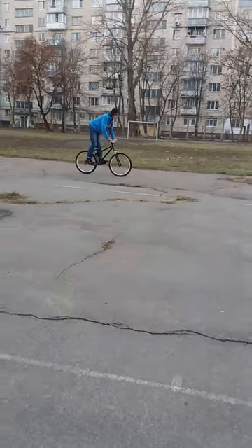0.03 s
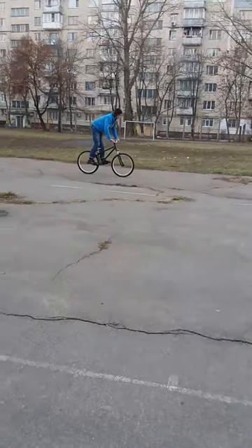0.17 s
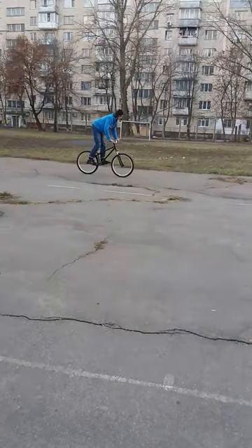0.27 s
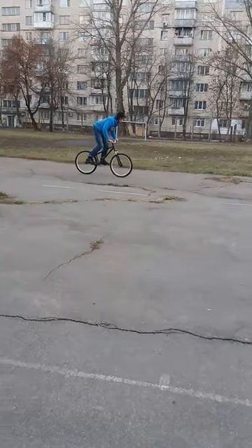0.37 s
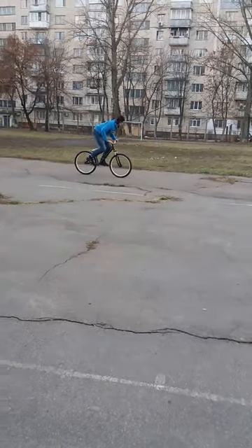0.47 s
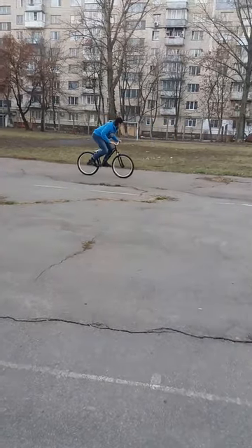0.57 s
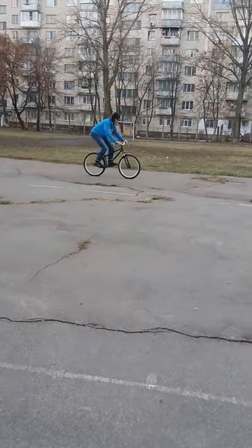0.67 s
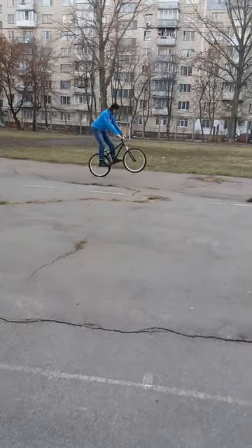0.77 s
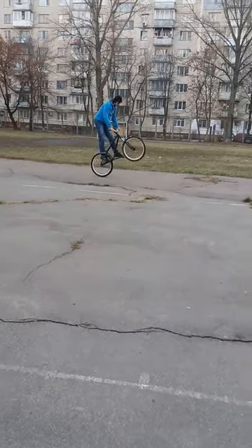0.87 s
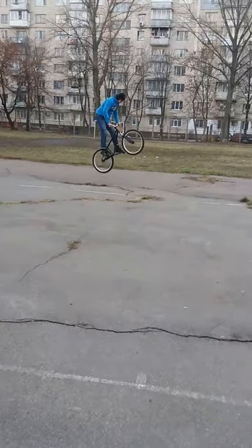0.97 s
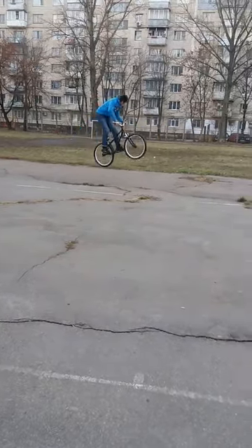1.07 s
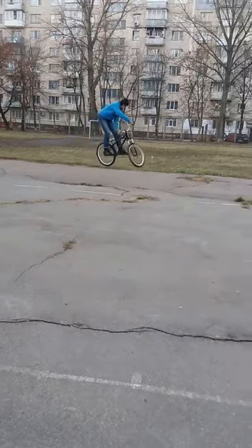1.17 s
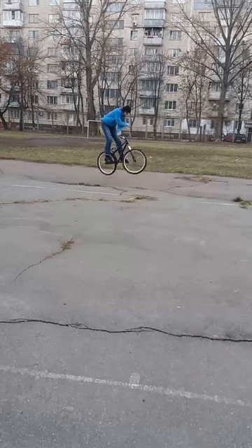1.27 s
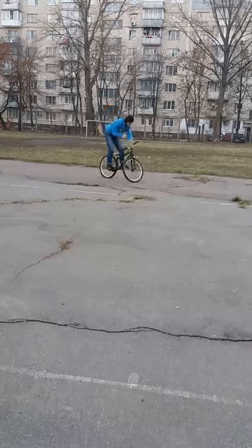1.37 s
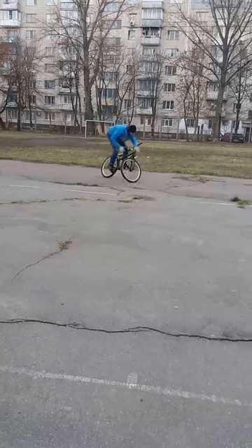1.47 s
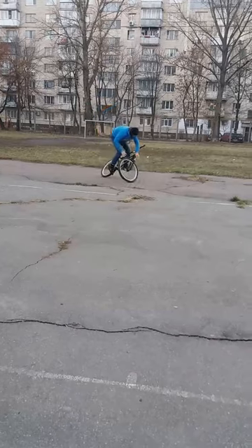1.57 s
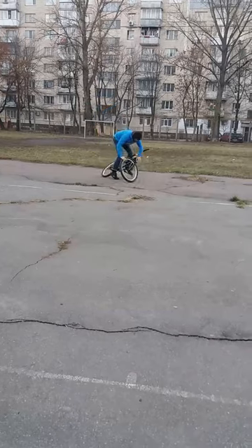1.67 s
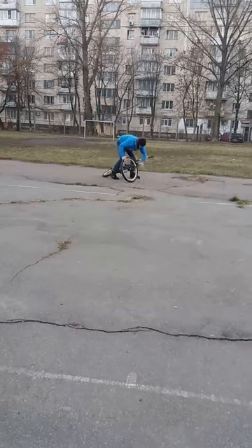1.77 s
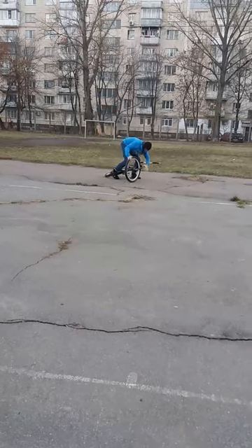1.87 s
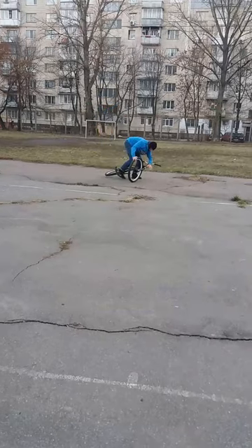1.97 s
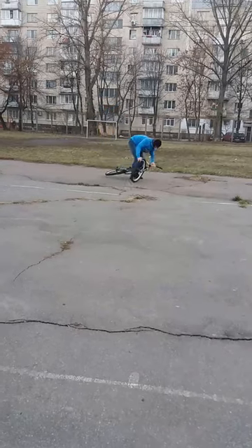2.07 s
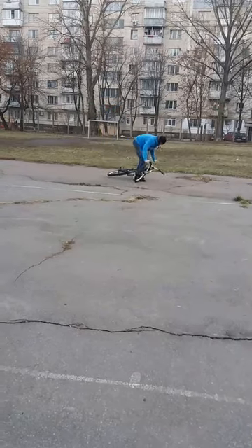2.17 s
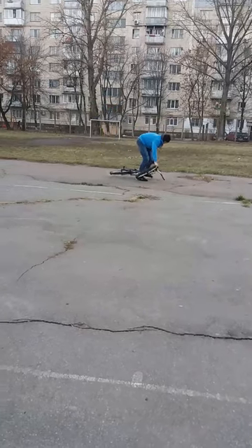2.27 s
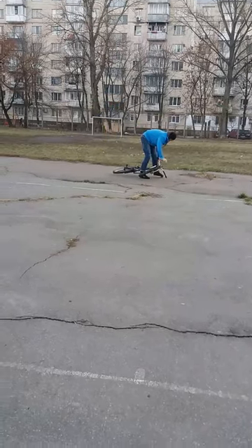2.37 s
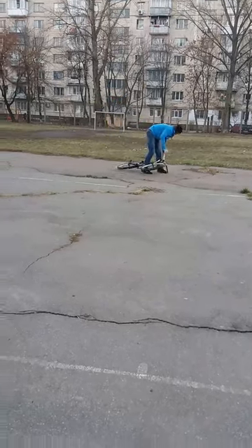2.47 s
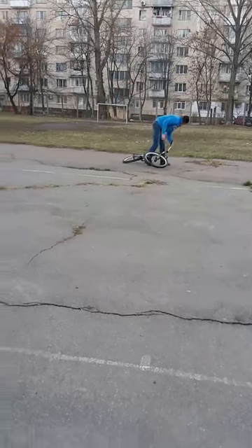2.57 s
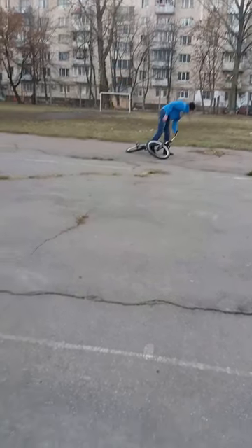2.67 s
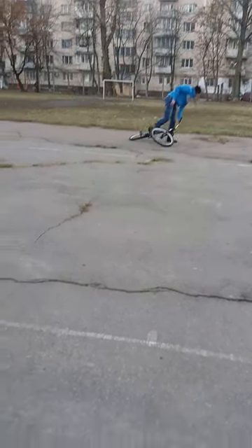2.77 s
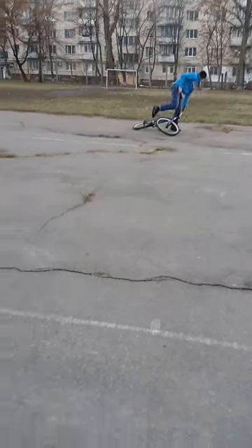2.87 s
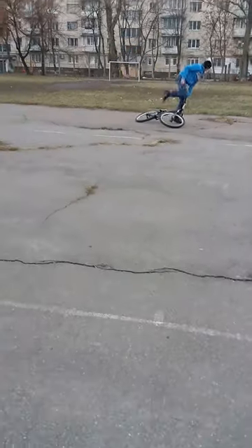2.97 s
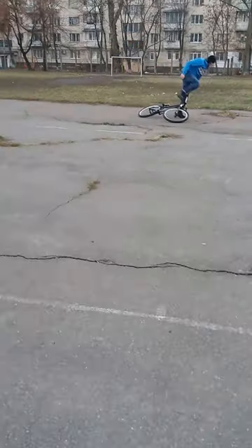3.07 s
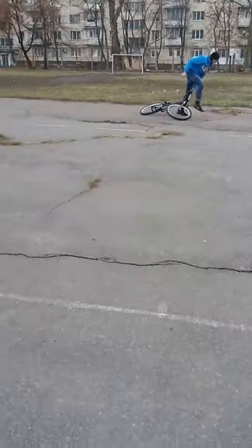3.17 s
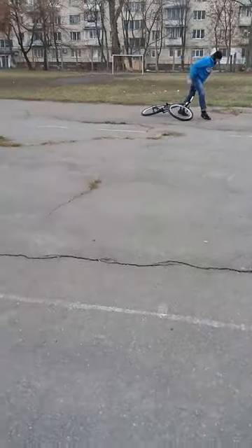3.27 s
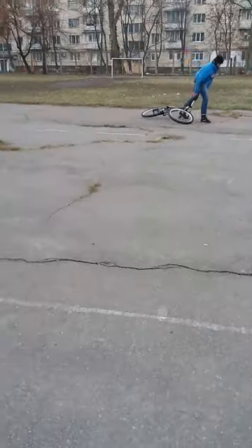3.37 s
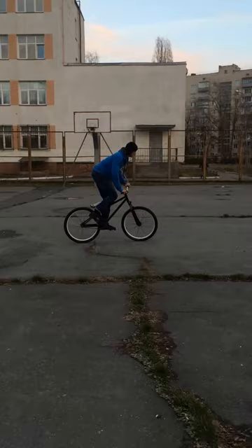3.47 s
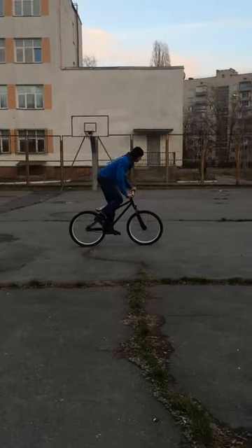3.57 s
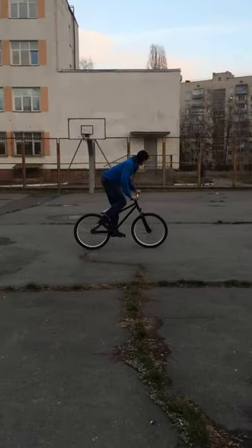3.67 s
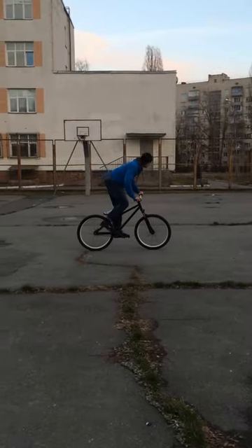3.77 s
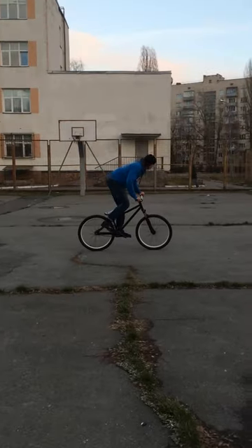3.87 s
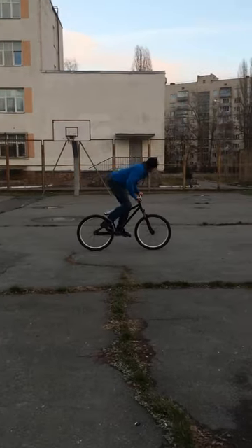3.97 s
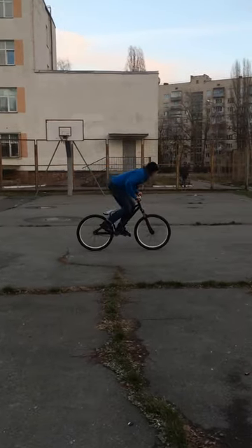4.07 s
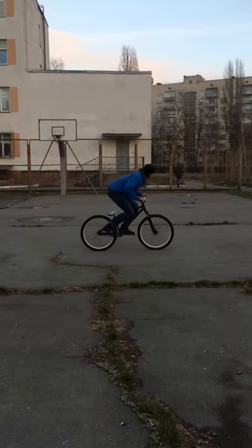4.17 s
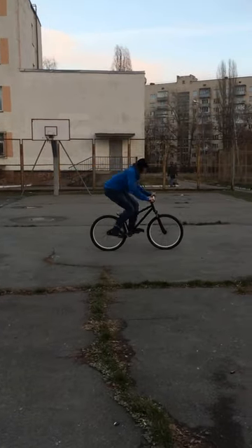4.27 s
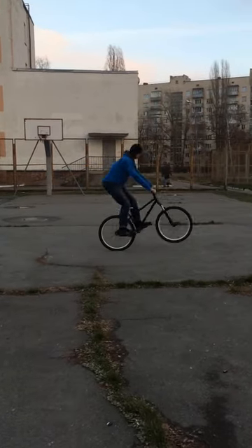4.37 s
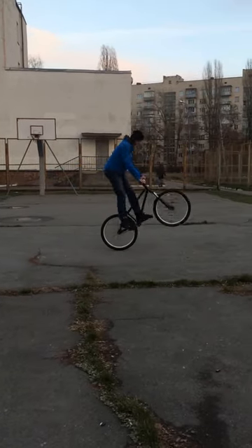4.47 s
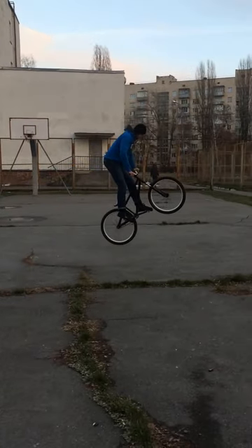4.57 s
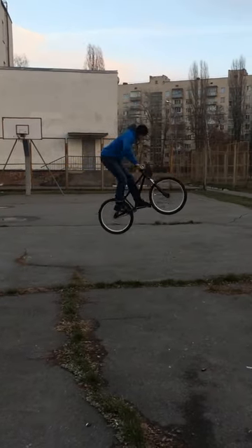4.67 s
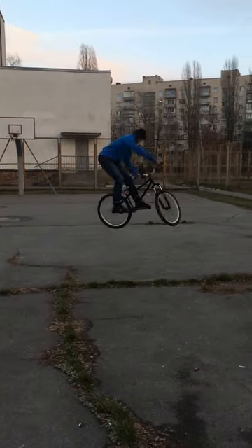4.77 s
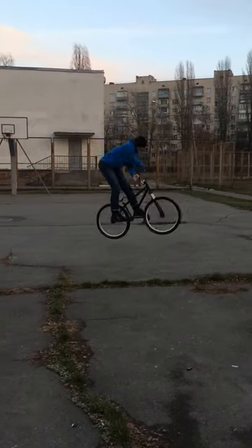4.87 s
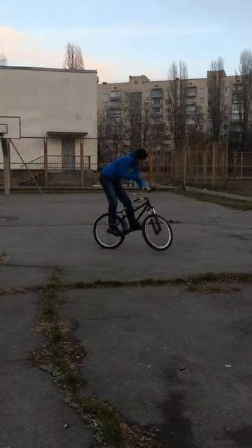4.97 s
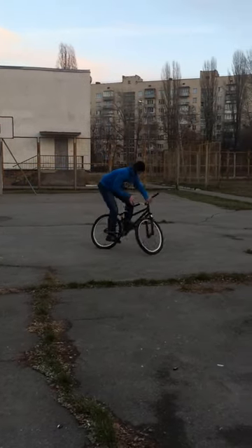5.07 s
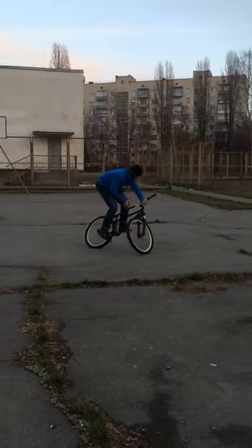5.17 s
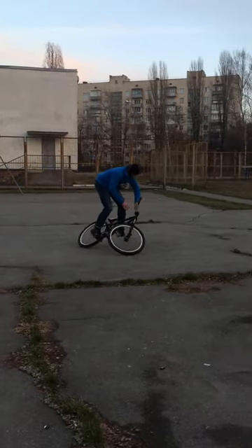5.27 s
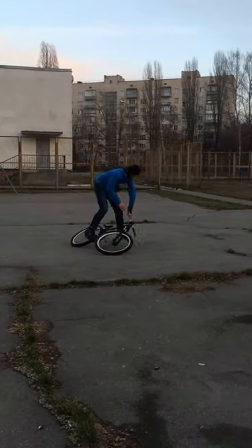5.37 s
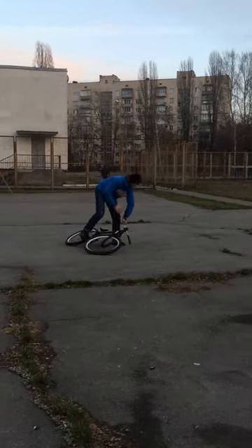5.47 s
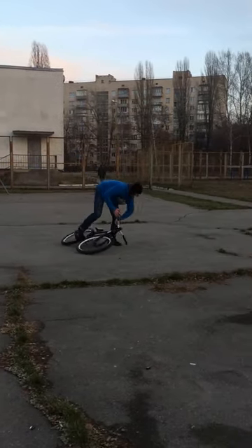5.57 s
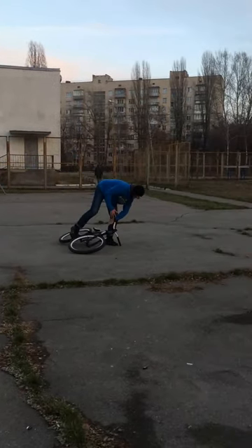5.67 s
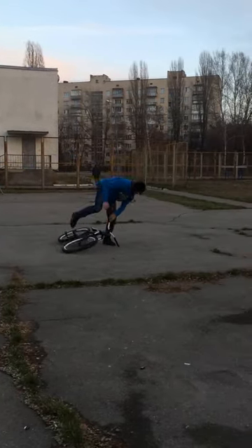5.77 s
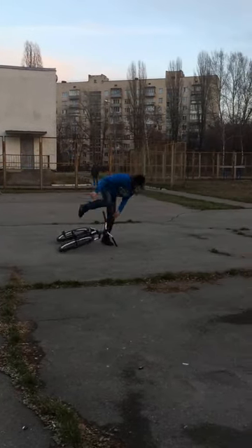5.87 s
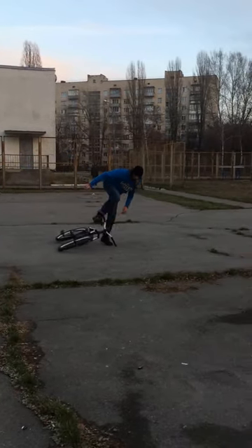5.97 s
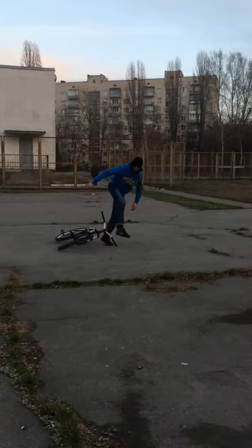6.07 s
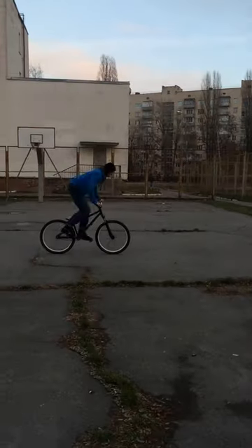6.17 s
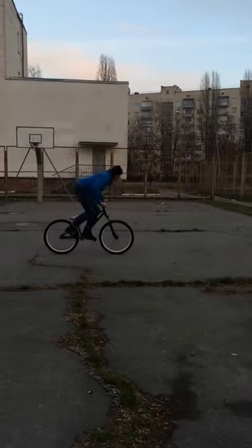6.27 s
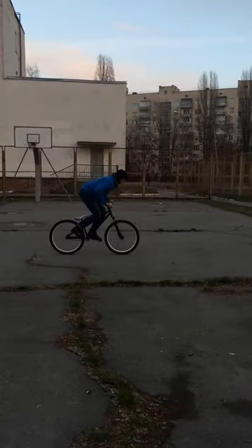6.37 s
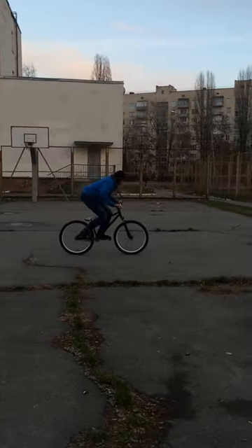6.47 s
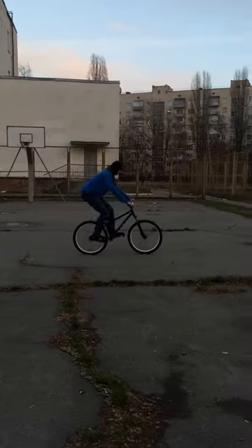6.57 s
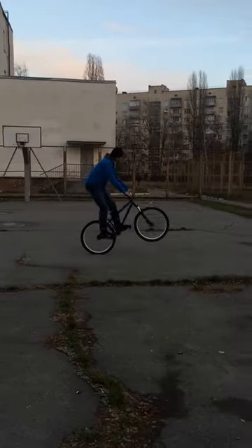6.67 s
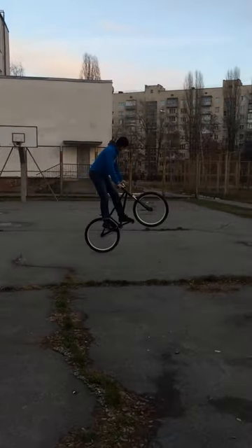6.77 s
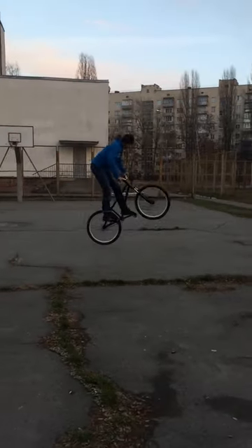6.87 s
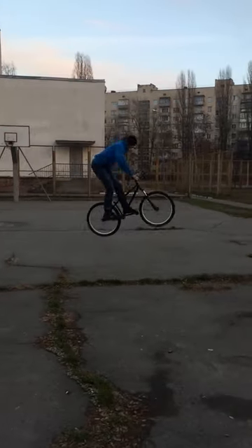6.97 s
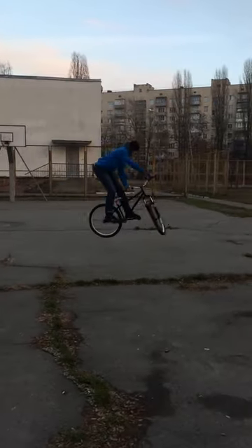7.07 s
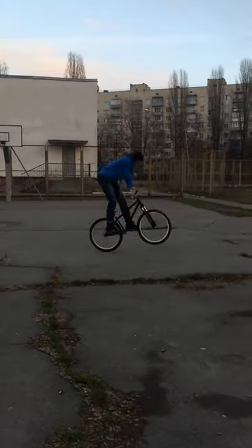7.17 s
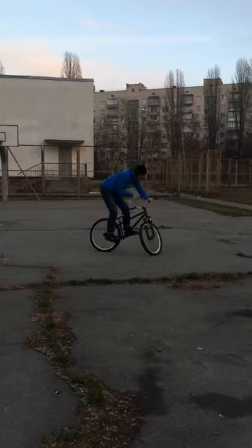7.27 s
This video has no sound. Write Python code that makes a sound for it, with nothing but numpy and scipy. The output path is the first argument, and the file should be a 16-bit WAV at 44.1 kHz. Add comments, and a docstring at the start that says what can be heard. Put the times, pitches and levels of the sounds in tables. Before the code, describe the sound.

Low town rumble and soft distant traffic run throughout. A hollow far tone dies away within 0.4 s while a distant bike rolls faintly on asphalt. A small stone snap and tyre scrub mark the hop at 0.8 s; clanks from 1.3 s lead to a sharp crack, thud and chattering clatter at 1.4 s. The bike tips over with scrapes, a knock at 1.9 s, a tiny rubber groan and clanks until 2.6 s. Close rustling follows from 2.65 s, with thumps and a rising groan near 3.45 s. At 3.5 s the sound turns close and bright: a loud stone snap at 3.6 s, freewheel ticks quickening before the 4.4 s hop. A heavy landing at 5.1 s sprays grit; metal clatters at 5.5 s as the bike falls. Ticks resume at 6.2 s, a hop at 6.7 s, and a hard cracking landing at 7.3 s, with short yard echoes.

```python
"""A far tone dies away over town rumble as a mountain bike, far off, rolls on asphalt and hops at 0.8 s.
It lands at 1.4 s: damped sines crack and thud, noise bursts clatter, frame modes ring; a close rustle follows.
At 3.5 s the listener's place jumps close to the bike: brighter, with freewheel ticks of ringing noise.
Hops at 4.4 s and 6.7 s land at 5.1 s and 7.3 s; grainy noise makes tyres, scrapes, rustle and town.
Twice the bike falls on its side; stones snap, gliding sines groan, the yard answers with a noise tail."""
import sys
import numpy as np
from scipy import signal
from scipy.fft import rfft, irfft, next_fast_len
from scipy.io import wavfile
from scipy.ndimage import uniform_filter1d, map_coordinates

SR = 44100
rng = np.random.default_rng(int(sys.argv[2]) if len(sys.argv) > 2 else 0)


def digitize_waveform(pressure):
    """Quantize a signal to 16-bit integers and store it at the path in sys.argv[1].

    Rows of a 2-D input are taken as channels; values are limited to [-1, 1].
    """
    field = np.atleast_2d(pressure).T
    bounded = np.clip(field, -1, 1)
    quanta = np.round(bounded * 32767).astype(np.int16)
    wavfile.write(sys.argv[1], SR, quanta)


N = 323246


def amp(db):
    """Amplitude of a level in dB."""
    return 10 ** (np.asarray(db) / 20)


def unit(x):
    """Scale to rms 1."""
    return x / np.sqrt(np.mean(x ** 2) + 1e-20)


def clock(length=N):
    """Sample times in seconds."""
    return np.arange(length) / SR


def sine(hz, t):
    """Steady tone."""
    return np.sin(2 * np.pi * hz * t)


def glide(hz):
    """Tone whose frequency follows a curve."""
    return np.sin(2 * np.pi * np.cumsum(hz) / SR)


def decay(t, t60):
    """Exponential fall, 60 dB in t60 seconds."""
    return np.exp(-np.log(1000) * t / max(t60, 1e-4))


def swell(s, sigma_s):
    """Gaussian rise and fall around time s."""
    return np.exp(-((clock() - s) / sigma_s) ** 2 / 2)


def wobble(rate_hz):
    """Smooth random curve, rate_hz knots a second."""
    knots = rng.standard_normal(int(N * rate_hz / SR) + 4)
    return map_coordinates(knots, [np.arange(N) * rate_hz / SR])


def along(points, hz):
    """Interpolate (hz, value) points on a log-frequency axis."""
    f, v = np.transpose(points)
    return np.interp(np.log(hz + 1), np.log(f), v)


def curves(rows):
    """One value per sample for each column after the time."""
    s, *columns = np.transpose(rows)
    return [np.interp(clock(), s, column) for column in columns]


def during(rows):
    """Soft-edged gate over the time a table spans."""
    t = clock()
    inside = (t >= rows[0][0]) & (t <= rows[-1][0])
    return uniform_filter1d(1.0 * inside, size=256)


def coloured(x, spectrum):
    """Minimum-phase filter through (hz, gain_db) points."""
    m = 2 * next_fast_len(len(x) // 2 + 2048)
    gain = amp(along(spectrum, np.fft.rfftfreq(m, 1 / SR)))
    cepstrum = irfft(np.log(gain))
    # folding onto positive time makes the filter causal
    cepstrum[1:m // 2] *= 2
    cepstrum[m // 2 + 1:] = 0
    return irfft(rfft(x, m) * np.exp(rfft(cepstrum)))[:len(x)]


def rush(spectrum, grain_db):
    """Coloured noise of rms 1 whose strength flickers on a scale of about 1.5 ms."""
    grain = amp(grain_db * np.tanh(wobble(SR / 64)))
    return unit(coloured(rng.standard_normal(N) * grain, spectrum))


def add(track, s, sound):
    """Mix a sound in at time s."""
    start = min(max(round(s * SR), 0), N)
    track[start:start + len(sound)] += sound[:N - start]


# the listener's place jumps from far to near
CUT_S = 3.511
# background, one table for the far place and one for the near: start_s, rumble_db, traffic_db
TOWN_LEVELS = [
    [(0.0, -45.5, -50.5), (0.33, -49, -51), (1.18, -47.5, -50), (1.62, -42.5, -47), (2.02, -48, -50.5),
     (2.84, -46, -42), (3.34, -49, -51), (3.5, -41, -53)],
    [(3.52, -44, -57), (3.74, -45.5, -57), (4.98, -44, -55.5), (5.12, -41.5, -54), (5.8, -47, -50),
     (6.25, -46, -58), (7.05, -47.5, -56.5), (7.2, -44, -57)],
]
# swelling deep hum: start_s, level_db
HUM_LEVELS = [(3.5, -51), (4.14, -45.5), (4.32, -36), (5.45, -42), (5.75, -55.5), (7.33, -48.5)]
# rumble and traffic spectra at each place: freq_hz, gain_db
FAR_RUMBLE_SPECTRUM = [(25, -76), (45, -28), (65, 2.5), (85, 5.5), (140, 3.5), (210, -1), (300, -16.5),
                       (500, -46.5)]
NEAR_RUMBLE_SPECTRUM = [(25, -28), (45, -11), (65, 4), (115, 5.5), (160, 2), (230, -1), (310, -21),
                        (500, -49)]
FAR_TRAFFIC_SPECTRUM = [(150, 0), (300, 4.5), (430, 0.5), (620, -3.5), (900, -3.5), (1450, 0),
                        (1900, -12.5), (3000, -16.5), (4200, -28), (6500, -38.5), (9000, -46.5),
                        (12000, -36.5), (15500, -31)]
NEAR_TRAFFIC_SPECTRUM = [(150, -2), (300, 3), (420, -3), (650, -1.5), (1000, -2), (1600, -8), (2500, -18),
                         (4000, -25), (8000, -43), (15000, -81)]


def town(far_trim_db=1, near_trim_db=2, hum_hz=54.2, waver_hz=1.07, hum_trim_db=-1):
    """Grainy noise for rumble and traffic, coloured by place, plus a wavering deep sine."""
    rumble_db, traffic_db = curves(np.concatenate(TOWN_LEVELS))
    far = clock() < CUT_S
    rumble = np.where(far, rush(FAR_RUMBLE_SPECTRUM, grain_db=2.5), rush(NEAR_RUMBLE_SPECTRUM, grain_db=2.5))
    far_traffic = amp(far_trim_db) * rush(FAR_TRAFFIC_SPECTRUM, grain_db=1.66)
    near_traffic = amp(near_trim_db) * rush(NEAR_TRAFFIC_SPECTRUM, grain_db=0.1)
    traffic = np.where(far, far_traffic, near_traffic)
    hum = unit(glide(hum_hz + waver_hz * wobble(4.2))) * during(HUM_LEVELS)
    out = amp(rumble_db) * rumble
    out += amp(traffic_db + 0.73 * wobble(7)) * traffic
    return out + amp(curves(HUM_LEVELS)[0] + hum_trim_db) * hum


# hollow distant tone dying away: start_s, level_db
HOOT_LEVELS = [(0, -38), (.065, -41.5), (.14, -42.5), (.18, -50.5), (.3, -50.5), (.4, -82)]
# its resonances: pitch_hz, half_width_hz, gain_db
HOOT_BANDS = [(439, 23, 2.5), (780, 110, -10), (936, 59, -12.5), (1380, 140, -14)]


def hoot():
    """A far tone, smeared by the buildings: noise in narrow resonant bands."""
    f = np.fft.rfftfreq(N, 1 / SR)
    gain = sum(amp(db) / (1 + ((f - hz) / width_hz) ** 2) for hz, width_hz, db in HOOT_BANDS)
    tone = unit(irfft(rfft(rng.standard_normal(N)) * gain, N))
    return amp(curves(HOOT_LEVELS)[0]) * tone


# close rubbing: start_s, body_db, hiss_db
RUSTLE_LEVELS = [(2.648, -39, -70), (2.658, -34, -56), (2.84, -31, -51), (2.9, -45.5, -53),
                 (3.03, -45, -55), (3.095, -36.5, -56), (3.14, -50, -56.5), (3.33, -55, -75),
                 (3.38, -44, -74), (3.45, -43, -70), (3.508, -34, -48)]
# body and hiss spectra: freq_hz, gain_db
BODY_SPECTRUM = [(35, -19), (70, -0.5), (140, 5.5), (300, 0.5), (700, -3), (1200, -0.5), (1550, 0),
                 (2000, -11), (3000, -15), (5000, -35)]
HISS_SPECTRUM = [(1500, 1.5), (3000, 7.5), (3900, -1), (4700, 5.5), (5700, -3.5), (6600, 0.5), (7500, 4),
                 (8800, -6.5), (11000, -5.5), (16000, -25)]


def rustle(body_trim_db=-1):
    """Soft close rubbing: low and high bands of grainy noise on separate level curves."""
    body_db, hiss_db = curves(RUSTLE_LEVELS)
    body = amp(body_db + body_trim_db) * rush(BODY_SPECTRUM, grain_db=4)
    hiss = amp(hiss_db) * rush(HISS_SPECTRUM, grain_db=2.5)
    return during(RUSTLE_LEVELS) * (body + hiss)


# short rubbery groans, one table each: start_s, pitch_hz, level_db
GROAN_GLIDES = [
    [(1.895, 300, -60), (1.92, 327, -40), (1.945, 330, -42), (1.975, 310, -60)],
    [(3.455, 152.8, -49), (3.472, 257, -32.5), (3.49, 322, -29.5), (3.503, 337, -30.5), (3.512, 340, -69)],
]


def groans():
    """Rubber sticks and slips at a gliding rate, voiced as sines."""
    out = np.zeros(N)
    for rows in GROAN_GLIDES:
        hz, db = curves(rows)
        out += during(rows) * amp(db) * glide(hz)
    return out


# tread rolling over grit: start_s, level_db
ROLL_LEVELS = [(0, -68), (3.4, -66), (4.1, -72.5), (5.4, -61), (5.9, -71.5), (6.02, -80), (6.2, -67),
               (7.33, -66)]
# bunny hops: liftoff_s, push_db, scrub_db
HOP_EVENTS = [(0.799, -60, -42), (4.42, -63, -37), (6.681, -61.5, -41)]


def tread(push_lead_s=0.053, push_sigma_s=0.1, scrub_sigma_s=0.0062,
          apex_s=0.27, flight_sigma_s=0.079, flight_db=-9,
          spray_t60_s=0.2, settle_db=-19, settle_t60_s=0.67):
    """Tyre pressure on grit: rolls, pushes off with a scrub, eases in flight, sprays on landing."""
    t = clock()
    airborne = sum(swell(liftoff_s + apex_s, flight_sigma_s) for liftoff_s, _, _ in HOP_EVENTS)
    out = amp(curves(ROLL_LEVELS)[0] + flight_db * airborne)
    for liftoff_s, push_db, scrub_db in HOP_EVENTS:
        out += amp(push_db) * swell(liftoff_s - push_lead_s, push_sigma_s)
        out += amp(scrub_db) * swell(liftoff_s, scrub_sigma_s)
    spray = decay(t, spray_t60_s) + amp(settle_db) * decay(t, settle_t60_s)
    for start_s, *_, grit_db in LANDING_EVENTS:
        add(out, start_s, amp(grit_db) * spray)
    return out


# short gritty scrapes, and one faint fine hiss at 3.53 s:
# centre_s, level_db, sigma_s, coarse_relative_db
SCRAPE_EVENTS = [(1.498, -50.5, 0.03, 10), (1.642, -54, .004, 11), (1.66, -45, .015, 4.5),
                 (1.749, -53, 0.019, 9.5), (1.916, -62.5, .008, 21.5), (2.157, -50.5, 0.0074, 7),
                 (2.203, -50, .008, 9.5), (2.36, -53, 0.0037, 13), (2.52, -59, 0.14, 0),
                 (3.218, -41, 0.0051, -6), (3.448, -37.5, 0.0097, 0.5), (3.527, -63, 0.016, -20),
                 (4.94, -45.5, 0.011, -3), (5.238, -44.5, 0.018, -22), (5.6, -64, 0.047, 9),
                 (5.84, -59.5, 0.052, -4)]
# fine and coarse grain spectra: freq_hz, gain_db
FINE_SPECTRUM = [(500, -2.5), (1500, 2.5), (3000, 3.5), (4500, 3.5), (7000, -0.5), (10000, -3.5),
                 (15000, -7)]
COARSE_SPECTRUM = [(100, -8), (300, 1), (900, -5), (1600, 2.5), (2300, -5.5), (3500, -13), (7000, -61)]


def scrapes(tread_trim_db=-1):
    """Fine grainy noise for rolling and short strokes; each stroke adds its share of coarse noise."""
    fine = amp(tread_trim_db) * tread()
    coarse = np.zeros(N)
    for centre_s, db, sigma_s, coarse_db in SCRAPE_EVENTS:
        stroke = amp(db) * swell(centre_s, sigma_s)
        fine += stroke
        coarse += amp(coarse_db) * stroke
    return fine * rush(FINE_SPECTRUM, grain_db=6) + coarse * rush(COARSE_SPECTRUM, grain_db=7)


# freewheel runs, slow coasting and fast with the front wheel pulled up:
# start_s, end_s, rate_per_s, level_db
TICK_RUNS = [(3.663, 3.95, 21.6, -36.5), (3.996, 4.23, 21, -37.5), (4.246, 4.4, 55, -35),
             (4.474, 4.56, 15, -35.5), (4.726, 4.86, 17, -37), (6.183, 6.36, 19.4, -38.5),
             (6.409, 6.49, 16.9, -37), (6.507, 6.74, 55, -38), (6.968, 7.14, 20, -39)]


def pawl_ticks(scatter_s=0.0011, scatter_db=0.9):
    """(start_s, level_db) of each tooth passing the pawl, nearly even within a run."""
    ticks = []
    for start_s, end_s, rate_per_s, db in TICK_RUNS:
        scatter = rng.standard_normal(size=(32, 2))
        for s, (late, louder) in zip(np.arange(start_s, end_s, 1 / rate_per_s), scatter):
            ticks.append((s + scatter_s * late, db + scatter_db * louder))
    return ticks


# freewheel colour: freq_hz, gain_db
TICK_SPECTRUM = [(1500, -15), (3300, -2.5), (4800, -8.5), (6500, -7), (9200, -7), (11000, -7.5),
                 (13000, -5.5), (16000, -10)]


def freewheel(trim_db=-4, noise_t60_s=0.035, rise_t60_s=0.0081,
              ring_hz=9200, ring_db=-15, ring_t60_s=0.062):
    """Tiny bright ticks: noise and a hub-shell ring swell, then decay."""
    out, t = np.zeros(N), clock(SR // 10)
    for start_s, db in pawl_ticks():
        ring = amp(ring_db) * sine(ring_hz * rng.normal(1, 0.0013), t) * decay(t, ring_t60_s)
        noise = rng.standard_normal(len(t)) * decay(t, noise_t60_s)
        add(out, start_s, amp(db + trim_db) * (noise + ring) * (1 - decay(t, rise_t60_s)))
    return coloured(out, TICK_SPECTRUM)


# stones snapping under the tread: start_s, level_db
STONE_EVENTS = [(0.409, -34.5), (0.798, -27), (3.6066, -14), (3.8001, -30.5), (4.0384, -37.5),
                (4.2507, -28)]


def stones(trim_db=1, snap_hz=4100, snap_t60_s=0.0022, dust_db=-15, dust_t60_s=0.01):
    """A pinched stone snaps as a short damped sine and scatters dust as noise."""
    out, t = np.zeros(N), clock(SR // 20)
    for start_s, db in STONE_EVENTS:
        snap = sine(snap_hz, t) * decay(t, snap_t60_s)
        dust = coloured(rng.standard_normal(len(t)) * decay(t, dust_t60_s), CLINK_SPECTRUM)
        add(out, start_s, amp(db + trim_db) * (snap + amp(dust_db) * dust))
    return out


# chain, pedals and bars striking once: start_s, level_db, knock_db, clink_db, t60_s
CLANK_EVENTS = [(1.3084, -32.5, 0.5, 1, 0.025), (1.3805, -26.5, -5, -8, 0.029),
                (1.704, -32, 0.5, -6.5, 0.036), (1.8669, -20, 0, -33, 0.024), (2.1869, -32.5, -6, -24, .05),
                (2.2931, -37, 7, -2.5, 0.1), (2.5729, -32, -3.5, -3.5, 0.12),
                (3.326, -32.5, 1.5, -19, 0.019), (3.3676, -23, -1.5, 3.5, 0.022),
                (3.4307, -34.5, 9, -6, 0.028), (5.0114, -29.5, -0.5, -3, 0.049),
                (5.0579, -28.5, -7, 1, 0.031), (5.321, -38, -15, -13, 0.026), (5.478, -39, -18, 3, 0.093),
                (5.5339, -21.5, -7.5, 4, 0.047), (5.745, -43.5, 11.5, -1, .06),
                (5.7658, -44.5, -1, 1, .045), (7.2168, -33.5, -1.5, 1, .027), (7.2725, -36, 4.5, 10, .045),
                (7.2922, -34.5, -8, 10.5, 0.023), (7.3012, -23, -8.5, 3, 0.033)]
# blows that chatter as the bike rebounds:
# start_s, level_db, knock_db, clink_db, t60_s, rebound_gap_s, rebound_loss_db
CHATTER_EVENTS = [(1.3851, -20.5, -7, -4, 0.046, 0.021, 8), (1.4193, -19, -2.5, -5, 0.065, 0.0098, 2),
                  (2.4438, -26.5, -8, -6.5, 0.057, 0.03, 6.5), (5.0179, -23.5, -6, 5, 0.026, .0105, 4),
                  (5.0745, -16, -3.5, -0.5, 0.041, .016, 7.5), (5.5893, -24.5, -4, 1, 0.022, 0.027, 7),
                  (7.3181, -18, 1.5, 4, 0.022, 0.01, 13)]


def contacts(count=4):
    """Single clanks, and chattering blows with ever weaker rebounds."""
    hits = list(CLANK_EVENTS)
    for start_s, db, knock_db, clink_db, t60_s, gap_s, loss_db in CHATTER_EVENTS:
        for k in range(count):
            hits.append((start_s + k * gap_s, db - k * loss_db, knock_db, clink_db, t60_s))
    return hits


def rattle(trim_db=-19, mean_wait_s=0.07, fade_db_per_s=70,
           centre_hz=3700, spread=0.3, ping_t60_s=0.04, count=9):
    """After each contact, chain links and cables rebound as small damped sines."""
    out, t = np.zeros(N), clock(SR // 12)
    for start_s, db, _, clink_db, _ in contacts():
        waits_s = rng.exponential(mean_wait_s, count)
        pitches_hz = centre_hz * np.exp(spread * rng.standard_normal(count))
        for wait_s, hz in zip(waits_s, pitches_hz):
            ping = sine(hz, t) * decay(t, ping_t60_s)
            ping_db = db + clink_db + trim_db - fade_db_per_s * wait_s
            add(out, start_s + wait_s, amp(ping_db) * ping)
    return out


# frame, rims and spokes: pitch_hz, level_db, t60_s
FRAME_MODES = [(770, -19.5, 0.22), (1456, -23, 0.077), (1800, -31, 0.24), (2490, -14, 0.19),
               (2740, -4.5, 0.12), (3300, -33.5, 0.66), (3660, 0.5, 0.027), (5030, -4, 0.027),
               (5640, -45, 0.091), (6600, 5, 0.064), (7225, -19, 0.16), (8870, -1, 0.12)]
# soft, middle and metallic contact spectra: freq_hz, gain_db
KNOCK_SPECTRUM = [(60, -23), (200, 6), (400, 3), (580, 2), (820, 5.5), (1200, -25), (2200, -37.5)]
CLACK_SPECTRUM = [(500, -51.5), (1100, -2.5), (1550, 9), (1950, 1.5), (2400, 3), (2900, -7.5),
                  (4000, -10.5), (8000, -46.5)]
CLINK_SPECTRUM = [(1500, -30), (3000, 5.5), (4200, 11.5), (6500, 3), (8500, -2.5), (12000, -8),
                  (16000, -10)]


def clanks(part_trim_db=-9, ring_db=-16, shiver_db=-19, shiver_t60_s=0.087, ground_gain=0.3):
    """Each contact is a dense burst, a shiver of loose parts and the ring of the frame."""
    out, t = np.zeros(N), clock(SR // 3)
    for start_s, db, knock_db, clink_db, t60_s in contacts():
        strengths = amp(rng.normal(0, 4, len(FRAME_MODES)))
        ring = sum(strength * amp(mode_db) * decay(t, mode_t60_s) * sine(hz, t)
                   for strength, (hz, mode_db, mode_t60_s) in zip(strengths, FRAME_MODES))
        envelope = decay(t, t60_s) + amp(shiver_db) * decay(t, shiver_t60_s)
        blow = rng.standard_normal(len(t)) * envelope + amp(ring_db) * ring / 2
        # asphalt reflection, random delay
        lag = int(rng.uniform(0.000318, 0.0012162) * SR)
        blow = blow + ground_gain * np.pad(blow, (lag, 0))[:len(t)]
        # soft contacts mostly knock, bare metal mostly clinks
        for spectrum, part_db in ((KNOCK_SPECTRUM, knock_db), (CLACK_SPECTRUM, 0), (CLINK_SPECTRUM, clink_db)):
            part = coloured(blow, spectrum)
            part = part / np.std(part[:SR // 128])  # level set over the first 8 ms
            add(out, start_s, amp(db + part_db + part_trim_db) * part)
    return out


# hard landings of wheels or feet: start_s, crack_db, crack_hz, thud_db, thud_hz, grit_db
LANDING_EVENTS = [(1.421, -7.5, 1640, -21, 119, -40), (1.8668, -17.5, 1300, -26, 136, -69),
                  (3.4286, -49, 500, -18.5, 102.6, -52), (5.0764, -13.5, 1030, -18, 96, -27),
                  (7.318, -10, 1090, -24, 125, -42)]


def landings(crack_t60_s=0.0073, snap_hz=5000, snap_db=-4, snap_t60_s=0.00065,
             thud_t60_s=0.073, sag_ratio=0.91, sag_tau_s=0.0016,
             wheel_hz=260, wheel_db=-4, wheel_t60_s=0.01):
    """The rim cracks and the wheel booms; the thud sinks in pitch as the tyre flattens."""
    out, t = np.zeros(N), clock(SR // 4)
    for start_s, crack_db, crack_hz, thud_db, thud_hz, _ in LANDING_EVENTS:
        crack = sine(crack_hz, t) * decay(t, crack_t60_s)
        snap = amp(snap_db) * sine(snap_hz, t) * decay(t, snap_t60_s)
        sinking_hz = thud_hz * (1 + sag_ratio * np.exp(-t / sag_tau_s))
        thud = glide(sinking_hz) * decay(t, thud_t60_s)
        wheel = amp(wheel_db) * sine(wheel_hz, t) * decay(t, wheel_t60_s)
        add(out, start_s, -amp(crack_db) * (crack + snap) - amp(thud_db) * (thud + wheel))
    return out


# yard reverberation: freq_hz, t60_s
YARD_DECAY = [(150, 0.4), (1500, 0.43), (5000, 0.22), (14000, 0.46)]


def yard(x, delay_s=0.025):
    """Surrounding walls answer: a delayed noise tail with its own decay at each frequency."""
    hz, t, z = signal.stft(rng.standard_normal(SR), SR, nperseg=256)
    fall = np.exp(-np.log(1000) * t / along(YARD_DECAY, hz)[:, None])
    tail = signal.istft(z * fall, SR, nperseg=256)[1]
    delayed = np.pad(x, (int(delay_s * SR), 0))
    return signal.fftconvolve(delayed, tail / np.linalg.norm(tail))[:N]


# the bike heard from far off: freq_hz, gain_db
FAR_SPECTRUM = [(1650, 0.5), (2400, -5), (3400, -5), (5000, -9.5), (6800, -7), (8600, -21.5), (11200, -7),
                (13000, -24), (16000, -12)]


def scene(wet_db=-17):
    """The bike in its yard, duller while far off, over the background."""
    blows = clanks() + rattle() + landings()
    bike = blows + amp(wet_db) * yard(blows) + stones() + freewheel() + scrapes()
    bike = np.where(clock() < CUT_S, coloured(bike, FAR_SPECTRUM), bike)
    return (bike + groans() + rustle() + hoot() + town())[None]


TOP_HZ = 15600


def record(dry, low_cut_hz=30):
    """The microphone thins the deepest bass and falls off steeply above TOP_HZ."""
    m = next_fast_len(N + SR // 2)
    high_pass = signal.butter(2, low_cut_hz, "highpass", fs=SR, output="sos")
    thinned = signal.sosfilt(high_pass, dry)
    low_pass = 1 / (1 + (np.fft.rfftfreq(m, 1 / SR) / TOP_HZ) ** 120)
    return irfft(rfft(thinned, m) * low_pass, m)[..., :N]


dry = scene()
out = record(dry)
digitize_waveform(out)
```